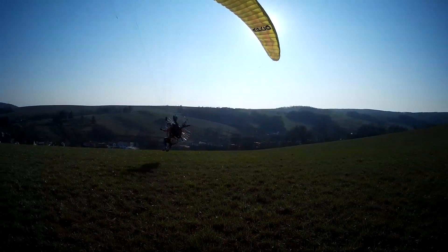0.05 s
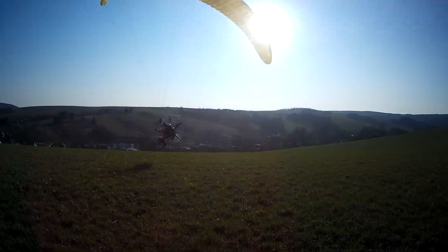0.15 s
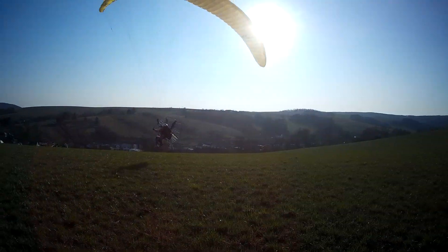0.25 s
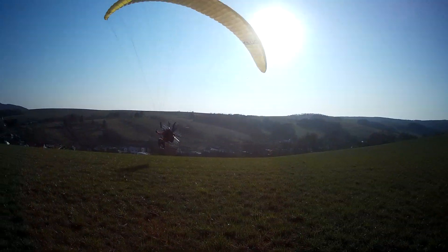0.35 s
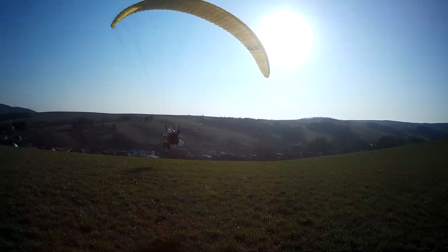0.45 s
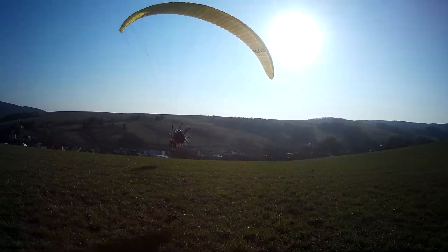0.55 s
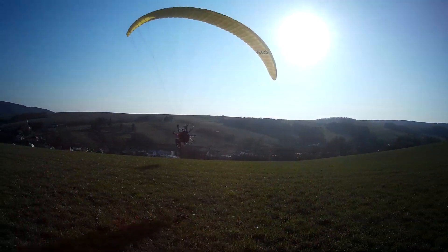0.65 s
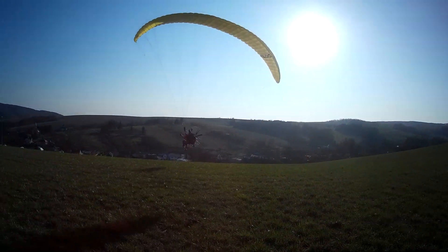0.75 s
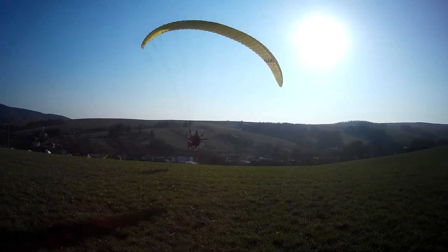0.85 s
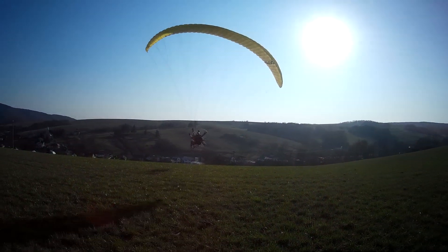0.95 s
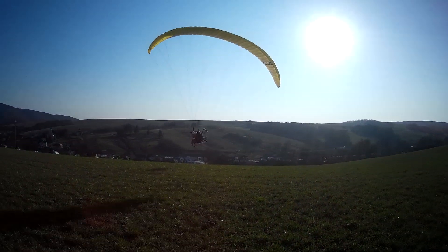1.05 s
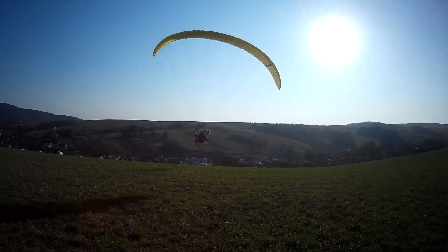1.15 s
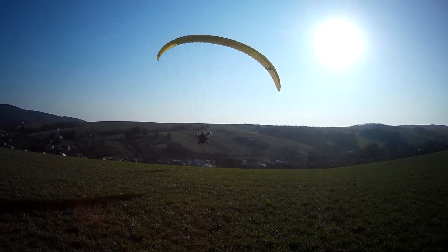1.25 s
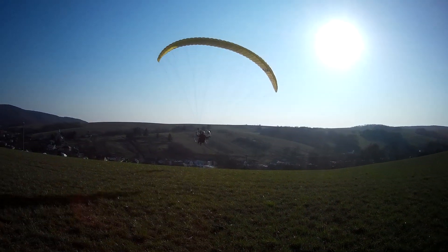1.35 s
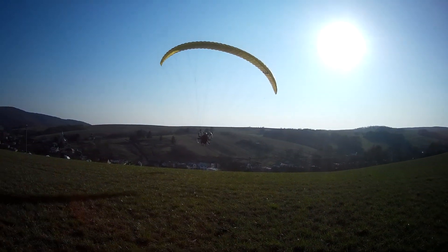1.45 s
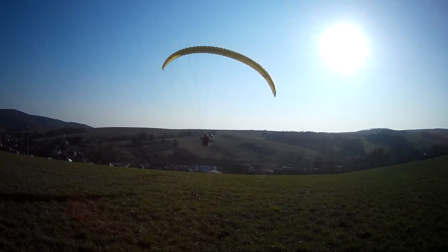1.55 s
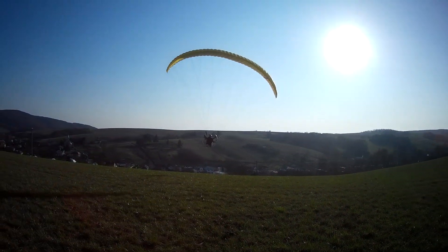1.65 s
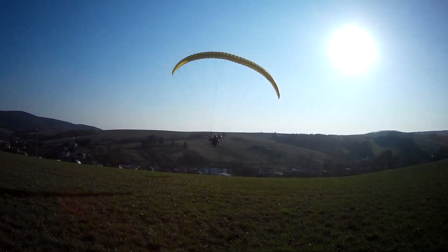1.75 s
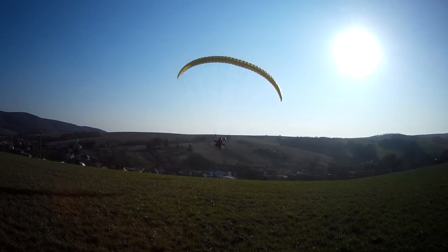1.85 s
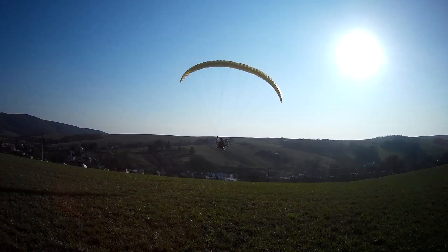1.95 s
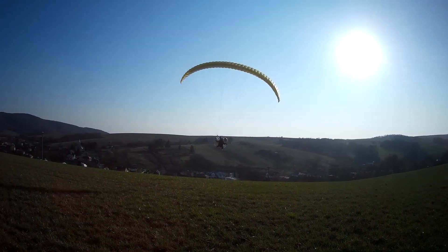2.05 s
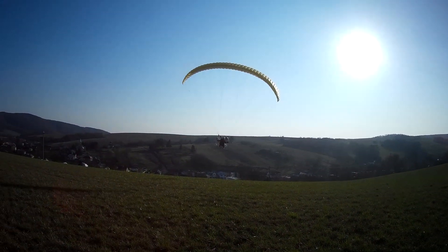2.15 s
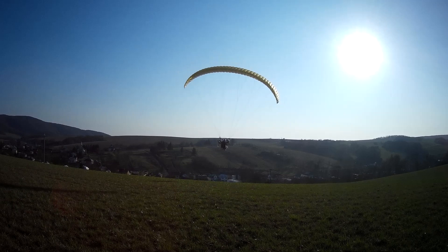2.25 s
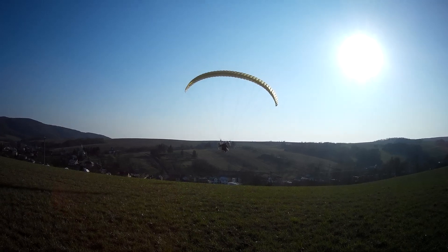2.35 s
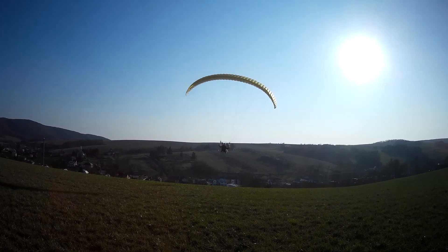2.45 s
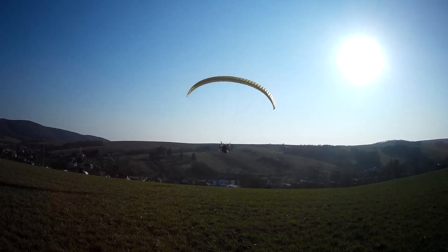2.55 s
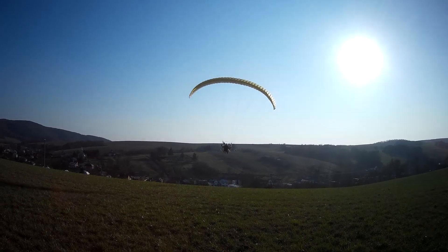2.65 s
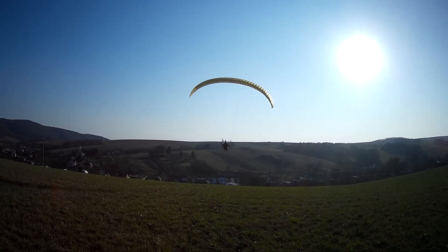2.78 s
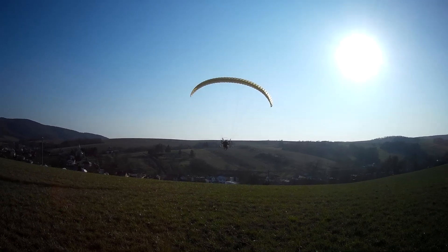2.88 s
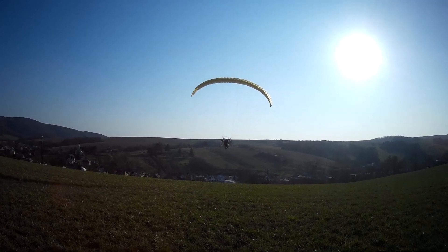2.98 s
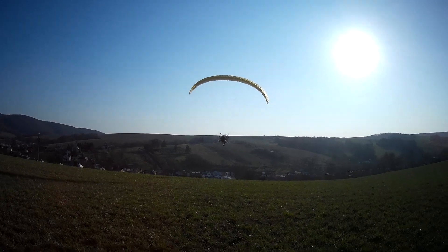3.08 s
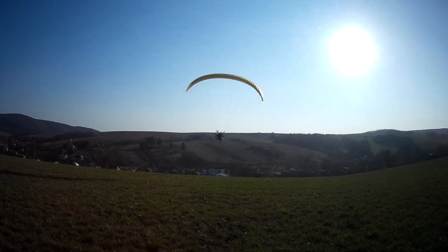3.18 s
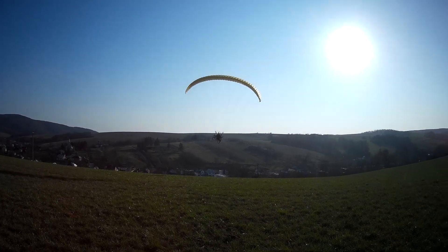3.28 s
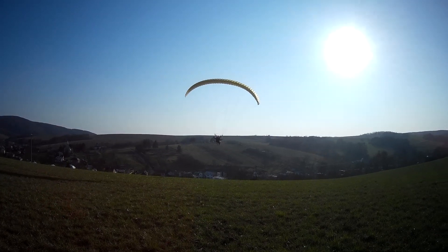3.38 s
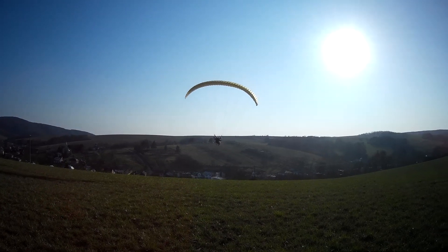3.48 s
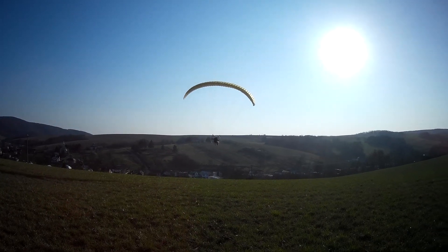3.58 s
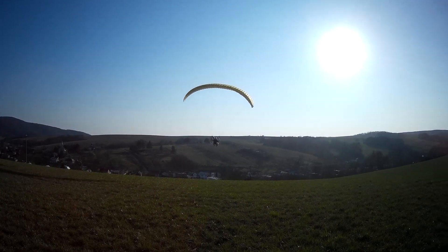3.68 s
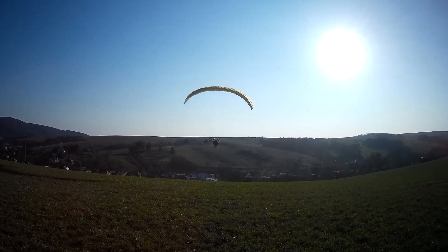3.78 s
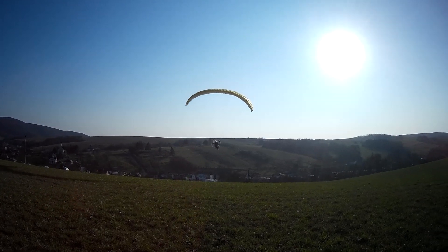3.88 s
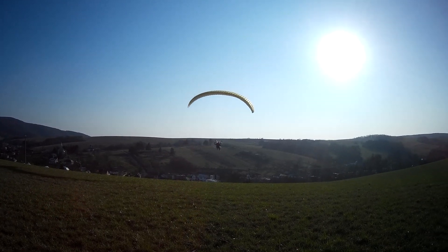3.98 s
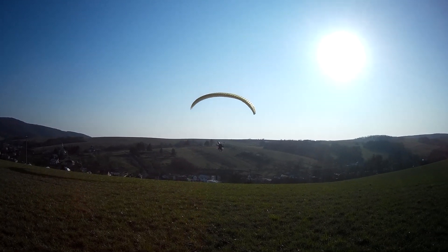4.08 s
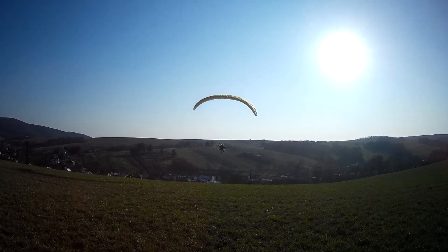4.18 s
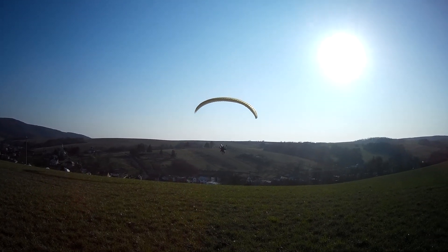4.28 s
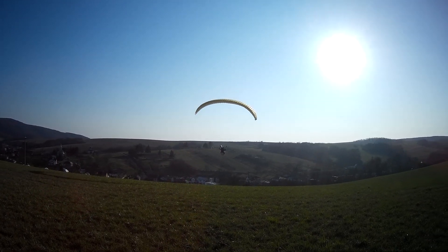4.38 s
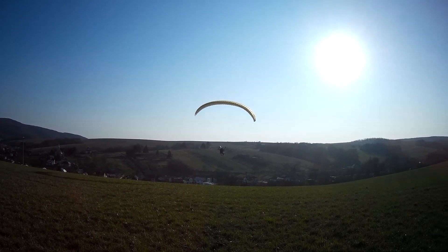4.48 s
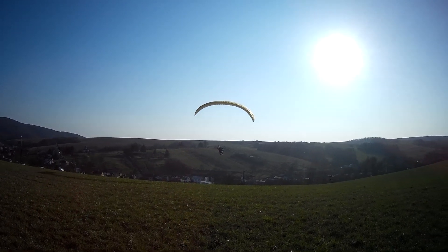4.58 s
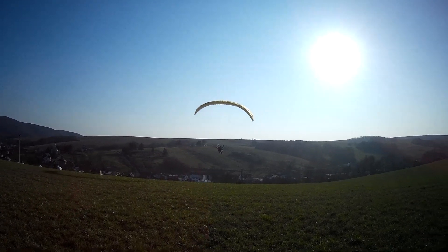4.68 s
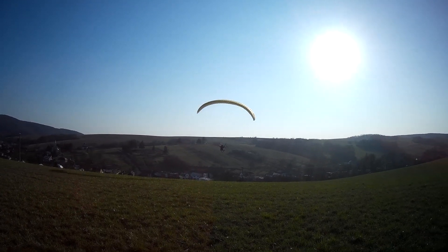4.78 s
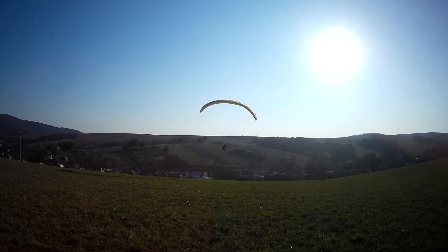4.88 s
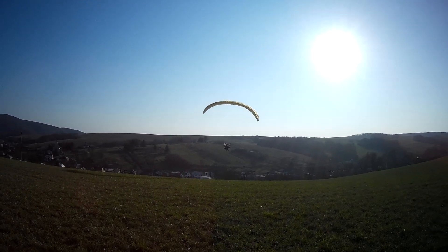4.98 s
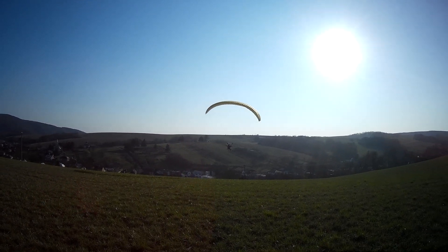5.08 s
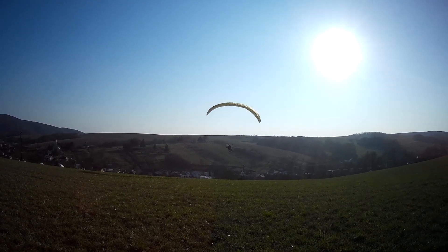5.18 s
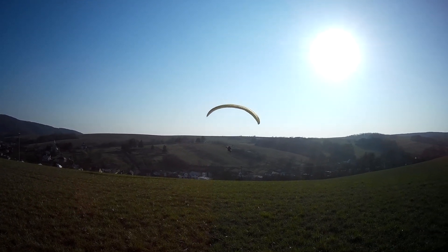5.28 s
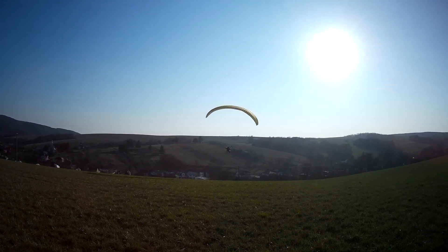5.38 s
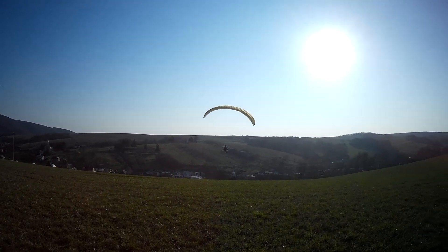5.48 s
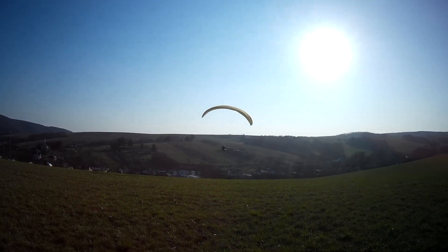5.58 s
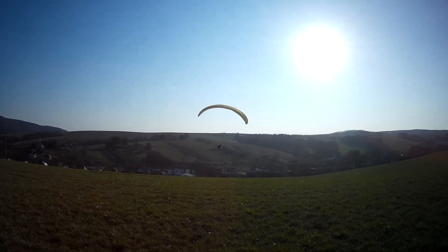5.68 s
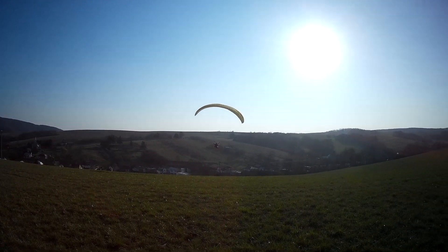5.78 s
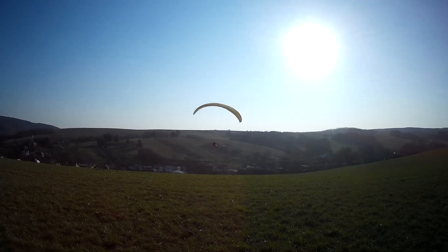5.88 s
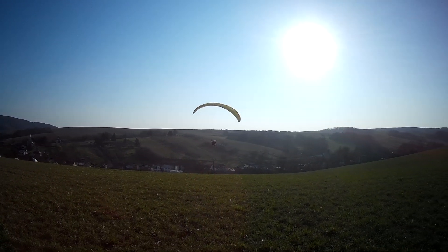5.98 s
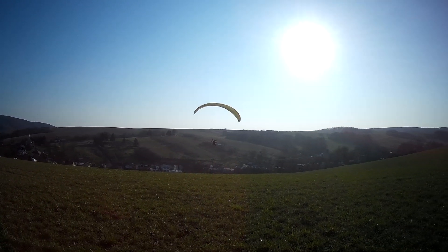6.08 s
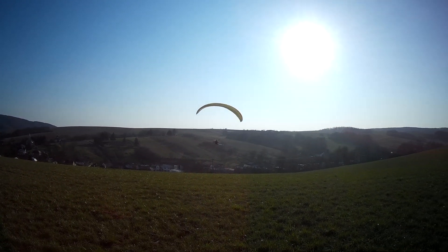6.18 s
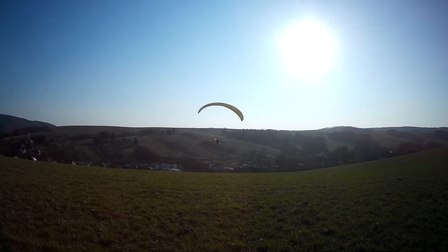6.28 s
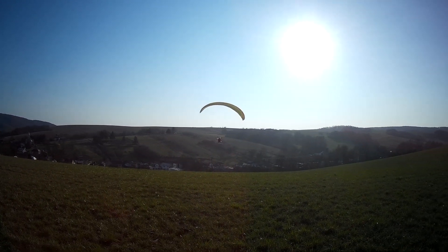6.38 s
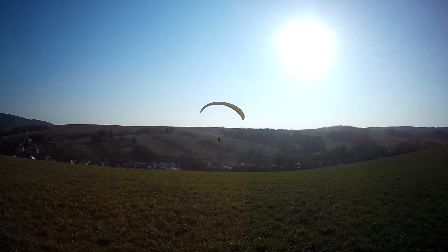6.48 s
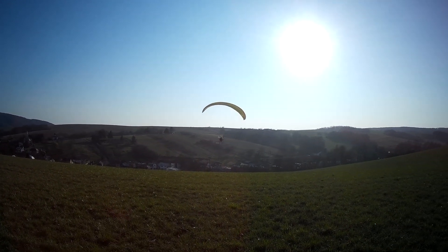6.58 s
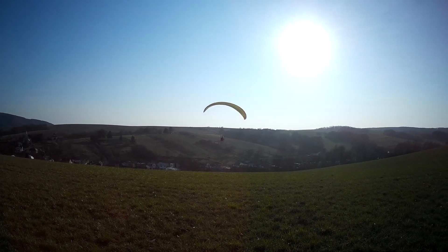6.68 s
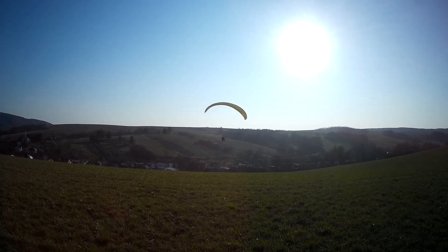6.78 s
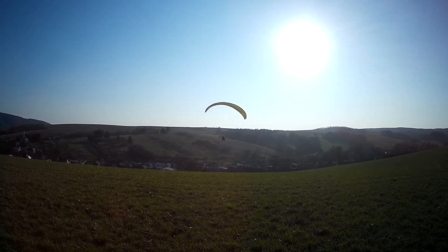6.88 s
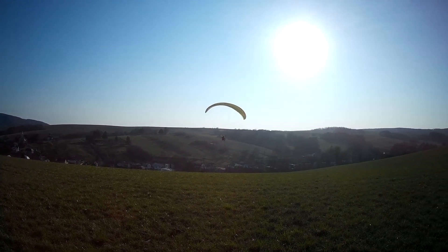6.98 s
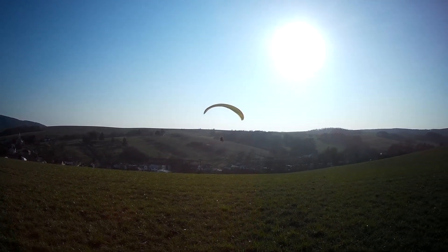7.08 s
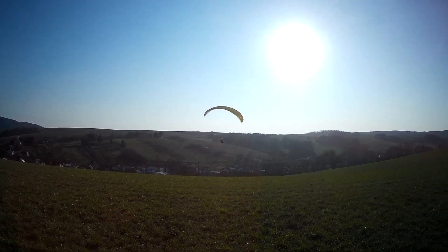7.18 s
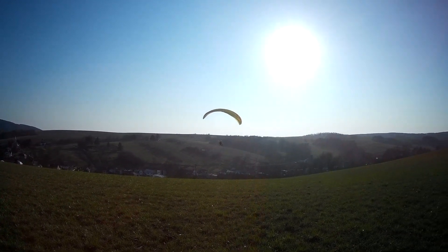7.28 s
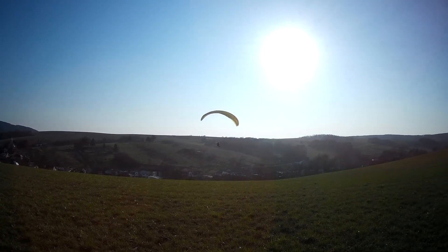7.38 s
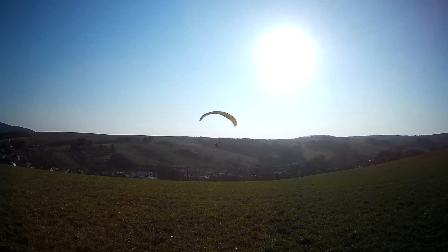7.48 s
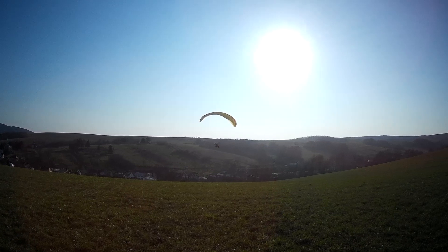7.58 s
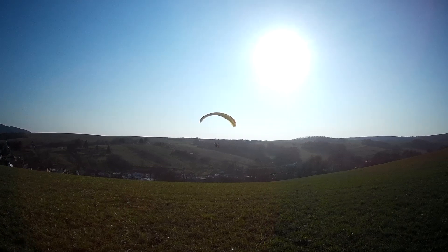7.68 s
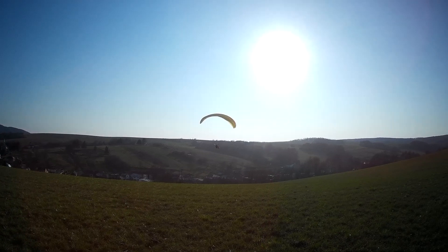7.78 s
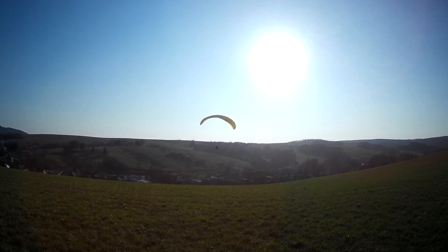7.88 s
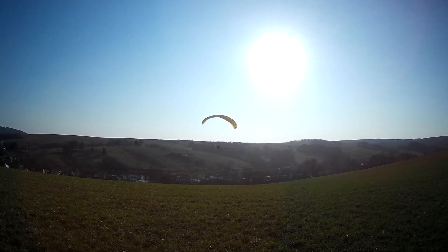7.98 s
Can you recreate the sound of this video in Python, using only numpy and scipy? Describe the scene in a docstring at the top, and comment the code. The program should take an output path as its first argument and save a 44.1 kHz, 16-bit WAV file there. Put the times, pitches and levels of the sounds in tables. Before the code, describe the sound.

Outdoors in an open field, a small propeller engine starts close, harsh and at high throttle, pushing the microphone into slight distortion. As the paramotor flies off, its beating drone and blade swish grow quieter, dipping in pitch, revving up again, and finally settling lower in the distance. Soft gusts buffet the microphone later on, above a faint hiss.

```python
"""A loud, close engine buzz that overloads the microphone: a paramotor climbing away over an open field.
Its pitch rises and sags with the throttle as it fades. The two-stroke exhaust and the belt-driven
propeller pulse at slightly different rates and beat against each other, over the swish of the blades.
Light gusts rumble on the microphone above a faint hiss."""
import sys
import numpy as np
from scipy import signal
from scipy.fft import rfft, irfft, next_fast_len
from scipy.io import wavfile
from scipy.ndimage import uniform_filter1d

SR = 44100
rng = np.random.default_rng(int(sys.argv[2]) if len(sys.argv) > 2 else 0)


def wav_record(signal):
    """Record a signal, one row per channel, as 16-bit PCM in the file named by sys.argv[1]."""
    frames = np.transpose(np.atleast_2d(signal))
    bounded = np.clip(frames, -1, 1)
    # unit amplitude maps onto the largest positive 16-bit level
    quanta = np.round(bounded * 32767).astype(np.int16)
    wavfile.write(sys.argv[1], SR, quanta)


N = 355005
T = np.arange(N) / SR

# Belt slip: (time [s], firings per blade pass)
BELT_RATIO = [(0, .978), (.35, .978), (.6, .968), (.9, .957), (8.05, .957)]
# Harmonic envelopes: (frequency [Hz], relative level [dB])
PROPELLER_SPECTRUM = [(80, -47), (120, -49.5), (175, -46), (240, -34.5), (330, -43.5), (460, -42),
                      (550, -36), (700, -33), (950, -35.5), (1250, -34.5), (1650, -34), (1950, -53),
                      (2400, -58.5), (5000, -66)]
EXHAUST_SPECTRUM = [(85, -63), (120, -47.5), (175, -39), (250, -47.5), (340, -42.5), (450, -52),
                    (590, -40.5), (780, -48.5), (1100, -40), (1700, -48), (1900, -59.5), (2300, -64.5),
                    (2800, -74.5)]
# Orders favoured by pulse shape: (order, propeller [dB], exhaust [dB])
ORDER_ACCENTS = [(1, 6.5, 11.5), (2, 7, 6), (3, -3, 2), (4, 6.5, 4), (5, 1, 6), (6, 8, 2), (7, 0, 5),
                 (8, 5.5, 7), (9, 1.5, 7), (10, 4.5, 7), (11, -1.5, 5.5), (12, 1.5, 3), (13, 0, 6)]
# Exhaust resonances: (centre [Hz], width [Hz], initial gain [dB], change per distance doubling [dB])
EXHAUST_RESONANCES = [(647.6, 69, 13.5, .5), (745, 66, 13.5, -6.5), (808, 94, 14.5, -1),
                      (1400, 270, -8, 3.5)]
# Balance laws: (initial gain at cruise [dB], per speed doubling [dB], per distance doubling [dB])
EXHAUST_BALANCE = (3.67, -7, -1.32)
SWISH_BALANCE = (-3.5, -3.5, 0.33)


def paramotor():
    """Blade and exhaust pulses beat as the belt slips; turbulence puffs with both."""
    blade_hz = blade_rate()
    firing_hz = blade_hz * curves(BELT_RATIO)[0]
    _, blade_accents, firing_accents = np.transpose(ORDER_ACCENTS)
    shake_turns = 0.00064 * wander(45)  # uneven firing jolts the shaft
    blade_turns = np.cumsum(blade_hz) / SR + shake_turns
    firing_turns = np.cumsum(firing_hz) / SR + shake_turns + 0.3494
    propeller = buzz(blade_hz, blade_turns, PROPELLER_SPECTRUM, blade_accents,
                     flutter=0.32, flutter_hz=8, orders=40)
    exhaust = buzz(firing_hz, firing_turns, EXHAUST_SPECTRUM, firing_accents,
                   flutter=0.66, flutter_hz=9, orders=26, resonances=EXHAUST_RESONANCES)
    exhaust *= 1 + 0.13 * wander(90)
    swish = gain_of(-20) * balance(SWISH_BALANCE) * blade_swish(blade_turns, firing_turns)
    tones = propeller + balance(EXHAUST_BALANCE) * exhaust
    drone = below(tones, 447)
    return drone + reflections(tones - drone) + swish


# Throttle: (time [s], blade-pass rate [Hz])
THROTTLE = [(0.0, 120.1), (0.35, 119.5), (0.74, 110.9), (1.02, 100.9), (1.38, 93.9), (2.09, 88.3),
            (2.61, 93.4), (2.94, 94.2), (3.22, 79.9), (3.43, 73.3), (3.78, 85.0), (4.09, 85.7),
            (4.51, 89.7), (5.06, 86.4), (5.41, 97.2), (5.72, 102.5), (6.4, 81.0), (6.89, 81.2), (7.1, 77.1),
            (7.44, 76.7), (8.05, 74.9)]


def blade_rate(inertia_s=0.12):
    """Blade passes per second; propeller inertia rounds off each throttle move."""
    return uniform_filter1d(curves(THROTTLE)[0], round(inertia_s * SR), mode="nearest")


def buzz(hz, turns, spectrum, accents_db, flutter, flutter_hz, orders, resonances=()):
    """Pulse harmonics glide through fixed resonances; turbulent air shakes the high ones most."""
    coarse_s, out = T[::64], np.zeros(N)
    rate_hz = np.interp(coarse_s, T, hz)
    doublings = np.interp(coarse_s, T, distance_doublings())
    for k in range(1, orders + 1):
        harmonic_hz = k * rate_hz
        knots = rng.standard_normal((2, 1024))
        gain_jitter, phase_jitter = (np.interp(coarse_s * flutter_hz, np.arange(1024), z) for z in knots)
        depth = flutter * np.minimum(harmonic_hz / 1200, 1.5)
        resonance_db = sum((db + far_db * doublings) / (1 + (2 * (harmonic_hz - centre) / width) ** 2)
                           for centre, width, db, far_db in resonances)
        level_db = spectrum_db(spectrum, harmonic_hz) + resonance_db
        level_db += accents_db[min(k, len(accents_db)) - 1]
        rms = gain_of(level_db) * np.exp(depth * gain_jitter - depth ** 2 / 2)
        phase = 2 * np.pi * k * turns + np.interp(T, coarse_s, depth * phase_jitter)
        out += np.interp(T, coarse_s, np.sqrt(2) * rms) * np.cos(phase)
    return out


# Blade turbulence: (frequency [Hz], relative density [dB])
SWISH_SPECTRUM = [(40, -47), (150, -19.5), (430, -13), (600, -3), (1000, 0.5), (1700, -0.5), (2000, -14.5),
                  (2600, -24.5), (3300, -21.5), (3700, -28), (4700, -21), (6200, -31), (8700, -27.5),
                  (16000, -45)]


def blade_swish(blade_turns, firing_turns):
    """Noise puffs at each blade pass and firing, and surges as the blades cut disturbed air."""
    puffs = 2.1 + 1.34 * np.exp(-(blade_turns % 1) / 0.21) + 0.5 * np.exp(-(firing_turns % 1) / 0.07)
    eddies = gain_of(0.78 * wander(14))
    return evened(coloured(puffs * eddies * rng.standard_normal(N), SWISH_SPECTRUM))


def reflections(x, decay_s=0.0092, taps=1024):
    """Frame, cage and ground smear each pulse; phase only, so the spectrum holds."""
    t = np.arange(taps) / SR
    echoes = evened(rng.standard_normal(taps) * np.exp(-t / decay_s)) / np.sqrt(taps)
    allpass = np.exp(1j * np.angle(rfft(echoes - (t == 0), 4 * taps)))
    return signal.oaconvolve(x, np.roll(irfft(allpass), taps))[taps:taps + N]


# Whines: (peak time [s], length [s], centre [Hz], boost [dB])
WHINE_SWELLS = [(2.25, 0.22, 3320, 4), (3.848, 0.13, 3400, 6), (4.1, 0.27, 1400, 3), (6.9, 0.71, 3120, 5),
                (7.12, 0.67, 1400, 12)]


def whines(x, relative_width=0.076):
    """Narrow bands swell out of the buzz as nasal whines."""
    for peak_s, length_s, centre_hz, db in WHINE_SWELLS:
        band = shaped(x, lambda hz: 1 / (1 + (2 * (hz / centre_hz - 1) / relative_width) ** 4))
        x = x + band * (gain_of(db * swell(peak_s, length_s)) - 1)
    return x


# Level at the microphone: (time [s], mid band [dB], treble re mid band [dB])
FLIGHT_LEVELS = [(0.0, -9.5, -16.5), (0.4, -12, -17), (1.03, -18, -20.5), (1.17, -16.5, -23),
                 (1.32, -18.5, -23), (1.93, -19.5, -16), (2.94, -21.5, -17.5), (3.14, -25.5, -21),
                 (3.47, -25, -25), (3.85, -25, -18.5), (3.9, -23.5, -20), (4.5, -26, -20),
                 (5.07, -23, -21.5), (5.4, -23.5, -18.5), (5.83, -27.5, -18.5), (6.37, -28, -22),
                 (7.11, -23.5, -24.5), (8.05, -29, -17)]
# Band near 2 kHz re the rest of the treble: (time [s], gain [dB])
LOW_TREBLE = [(0, 1.5), (3.3, -1.5), (3.87, -4), (5.3, 4), (6.0, -11), (7.0, -10), (7.55, 4.5)]
# Balance laws: (initial gain at cruise [dB], per speed doubling [dB], per distance doubling [dB])
DRONE_BALANCE = (1.18, 0, -1.08)
BRIGHT_BALANCE = (-1.4, 2.4, -0.13)
FIZZ_BALANCE = (0.45, -1.6, -2.12)
# Microphone port ripple: (frequency [Hz], gain [dB])
MIC_PORT = [(2300, 4.5), (2700, 1.5), (3300, 2.5), (3750, -1.5), (4300, -0.5), (6000, -3.5), (8800, -7),
            (9700, -12.5), (10600, -4), (11400, -9.5), (12300, 1), (13400, -2), (15500, -14)]


def flight(source):
    """The buzz fades with distance, the fizz fastest; the mids dull as the engine slows."""
    mid_db, treble_db = curves(FLIGHT_LEVELS)
    low_treble_db, = curves(LOW_TREBLE)
    drone = below(source, 430)
    treble = source - below(source, 1908, order=24)
    mids = source - drone - treble
    # The top of the mids swells with the treble and thins as the band just above fills.
    bright_gain = balance(BRIGHT_BALANCE) * gain_of(1.3 * (treble_db + 20) - 0.44 * low_treble_db)
    mids += (mids - below(mids, 1440, order=10)) * (bright_gain - 1)
    treble += below(treble, 2180) * (gain_of(low_treble_db) - 1)
    fizz = treble - below(treble, 4000, order=10)
    treble = coloured(treble + fizz * (balance(FIZZ_BALANCE) - 1), MIC_PORT)
    mid_gain = gain_of(mid_db) / running_rms(mids)
    treble_gain = gain_of(mid_db + treble_db) / running_rms(treble)
    return (drone * balance(DRONE_BALANCE) + mids) * mid_gain + treble * treble_gain


def distance_doublings(first_doubling_s=0.79):
    """Log2 of relative distance, receding at a steady speed."""
    return np.log2(1 + T / first_doubling_s)


def balance(law, cruise_hz=90):
    """A part's gain against engine speed and distance."""
    start_db, speed_db, distance_db = law
    speed_doublings = np.log2(blade_rate() / cruise_hz)
    return gain_of(start_db + speed_db * speed_doublings + distance_db * distance_doublings())


# Buffeting: (frequency [Hz], relative density [dB])
WIND_SPECTRUM = [(10, -12), (25, -4), (55, -1.5), (100, -1), (200, -4.5), (350, -11.5), (700, -37),
                 (3000, -75)]
# Gusts: (peak time [s], length [s], level [dB])
WIND_GUSTS = [(1.2, .5, -66), (3.05, 0.57, -48.5), (4.4, 0.57, -57), (5.49, 0.71, -38.5),
              (6.693, 0.48, -41), (7.85, 0.14, -42)]


def wind(breeze_db=-47, rise_s=0.91):
    """Air buffets the microphone: a light breeze gets up, gusts swell and die away."""
    rumble = evened(coloured(rng.standard_normal(N), WIND_SPECTRUM))
    lumps_db = 1.6 * wander(18)
    breeze = gain_of(breeze_db) * np.minimum(T / rise_s, 1)
    gusts = sum(gain_of(db) * swell(peak_s, length_s) for peak_s, length_s, db in WIND_GUSTS)
    return rumble * (breeze + gusts) * gain_of(lumps_db)


# Noise floor: (frequency [Hz], relative density [dB])
HISS_SPECTRUM = [(100, 0), (1000, -7), (6000, 4), (9000, -0.5), (13500, 0.5), (15000, -2), (16500, -11)]


def hiss(level_db=-63):
    """Faint steady hiss."""
    return gain_of(level_db) * evened(coloured(rng.standard_normal(N), HISS_SPECTRUM))


def gain_of(db):
    """Decibels to amplitude."""
    return 10 ** (np.asarray(db) / 20)


def evened(x):
    """Scales to unit rms."""
    return x / np.sqrt(np.mean(x ** 2) + 1e-20)


def running_rms(x, samples=9000):
    """Smoothed rms envelope."""
    return np.sqrt(uniform_filter1d(uniform_filter1d(x ** 2, samples), samples // 2) + 1e-14)


def spectrum_db(points, hz):
    """Interpolates a spectrum table in log frequency."""
    knots_hz, db = np.transpose(points)
    return np.interp(np.log(hz + 1), np.log(knots_hz), db)


def curves(rows):
    """Each column of a time table at every sample."""
    times_s, *columns = np.transpose(rows)
    return [np.interp(T, times_s, column) for column in columns]


def shaped(x, gain):
    """Zero-phase filter with response gain(hz)."""
    size = next_fast_len(N + 4096)
    return irfft(rfft(x, size) * gain(np.fft.rfftfreq(size, 1 / SR)), size)[:N]


def coloured(x, points):
    """Filters by a spectrum table."""
    return shaped(x, lambda hz: gain_of(spectrum_db(points, hz)))


def below(x, edge_hz, order=16):
    """Low-pass."""
    return shaped(x, lambda hz: 1 / (1 + (hz / edge_hz) ** order))


def wander(rate_hz):
    """Random drift, unit rms."""
    knots = rng.standard_normal(4096)
    return evened(np.interp(T * rate_hz, np.arange(len(knots)), knots))


def swell(peak_s, length_s):
    """Gaussian rise and fall, peak 1."""
    return np.exp(-(2 * (T - peak_s) / length_s) ** 2)


def scene():
    """The receding paramotor over wind and hiss, mono."""
    noise_floor = hiss()
    return (flight(whines(paramotor())) + wind() + noise_floor)[None]


def record(dry, edge_hz=16400):
    """Microphone overload clips the loudest peaks; a band limit follows."""
    clipped = np.clip(dry, -0.97, 0.97)
    lowpass = signal.firwin(511, edge_hz, window=("kaiser", 9), fs=SR)
    return signal.oaconvolve(clipped, lowpass[None], "same")


dry = scene()
out = record(dry)
wav_record(out)
```